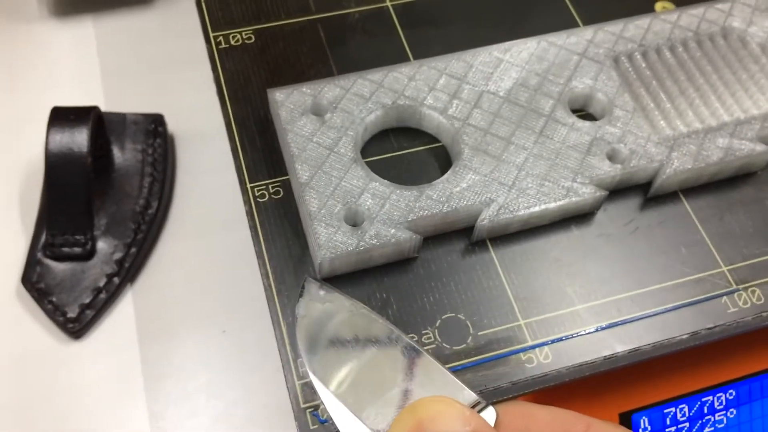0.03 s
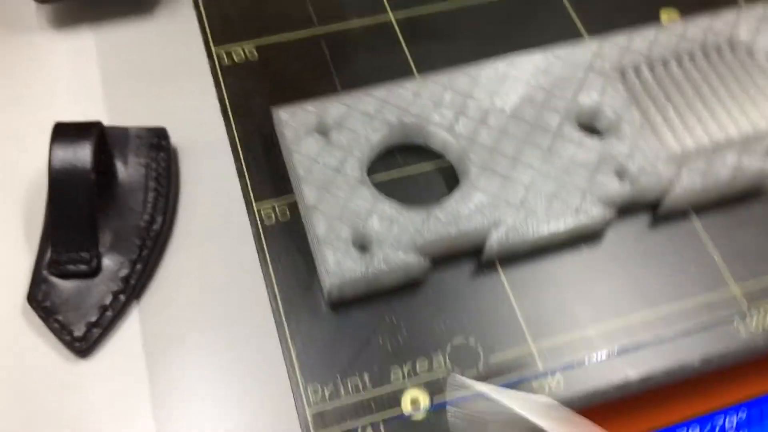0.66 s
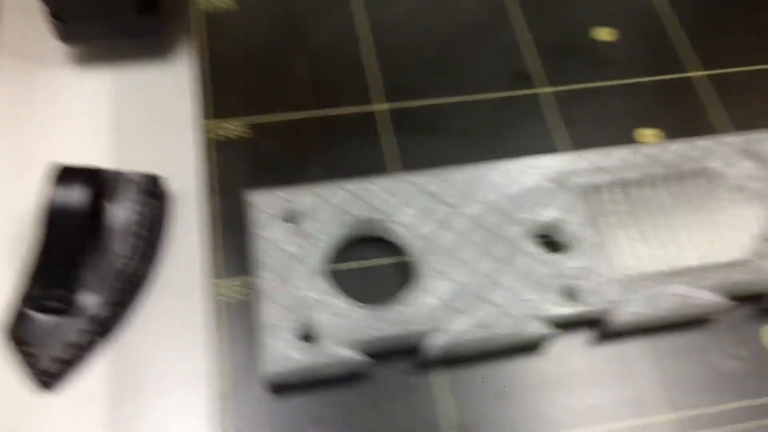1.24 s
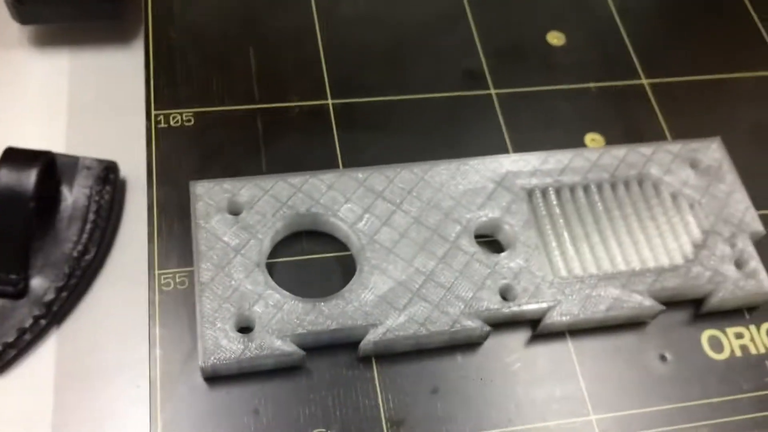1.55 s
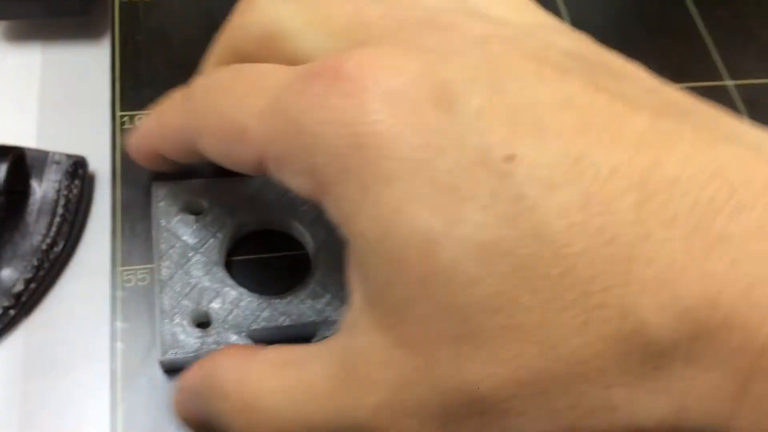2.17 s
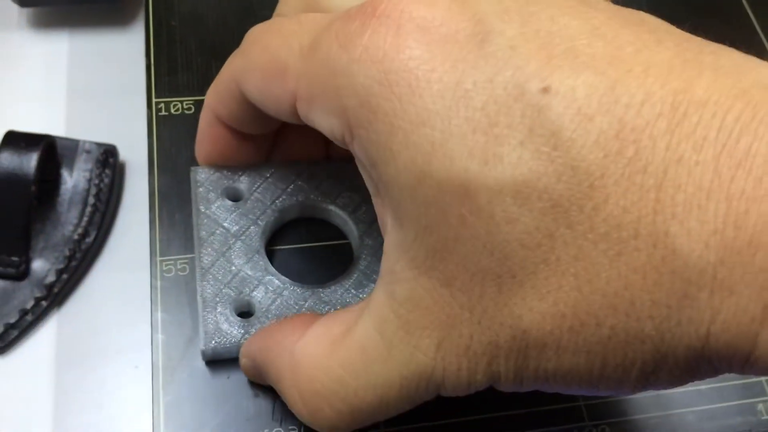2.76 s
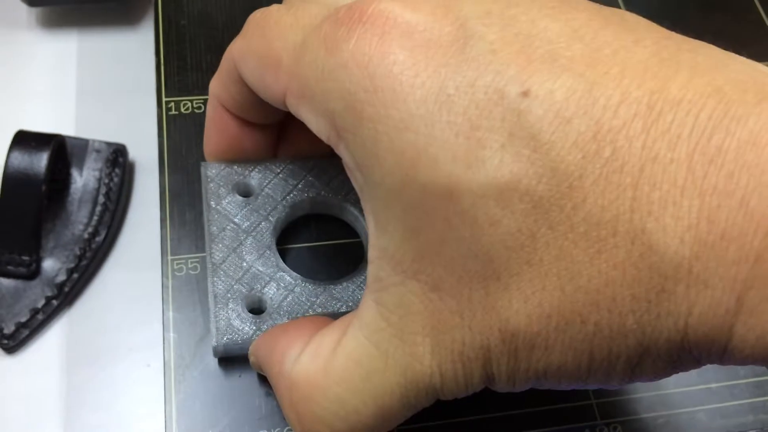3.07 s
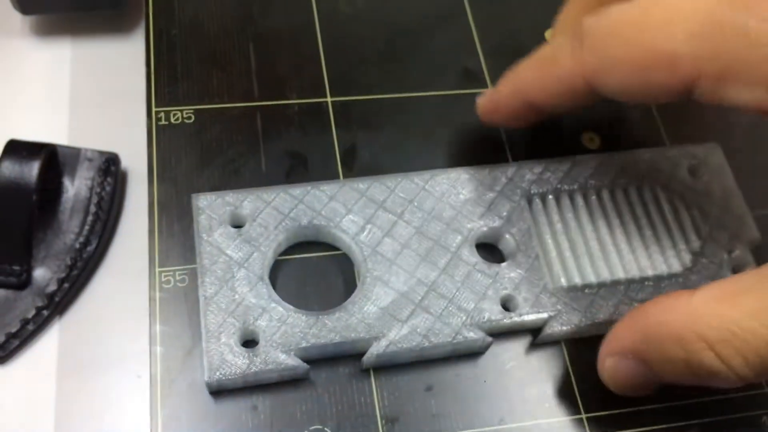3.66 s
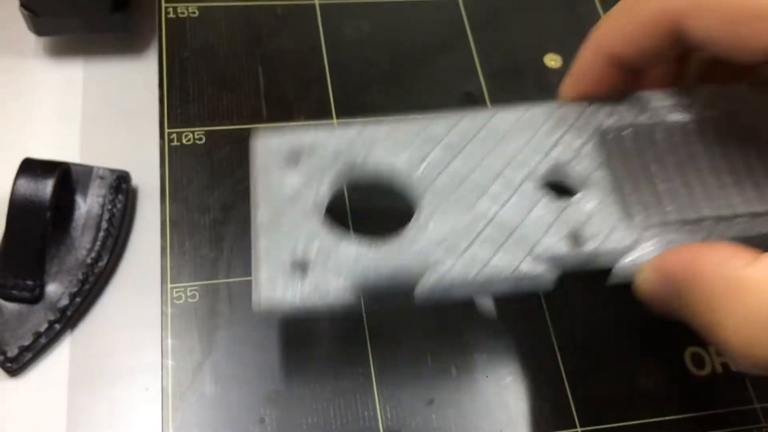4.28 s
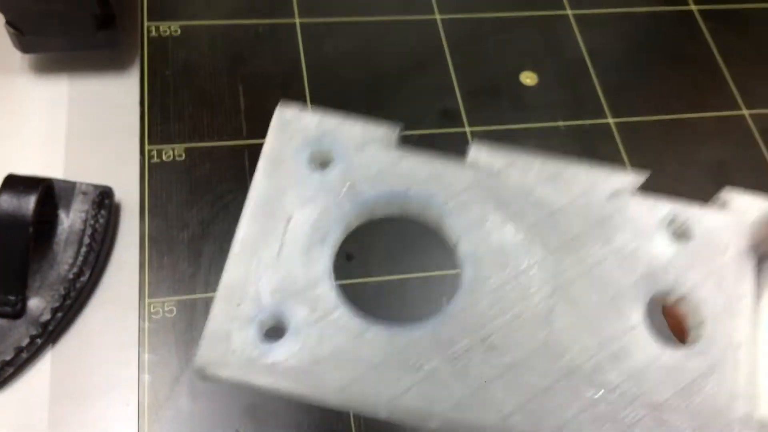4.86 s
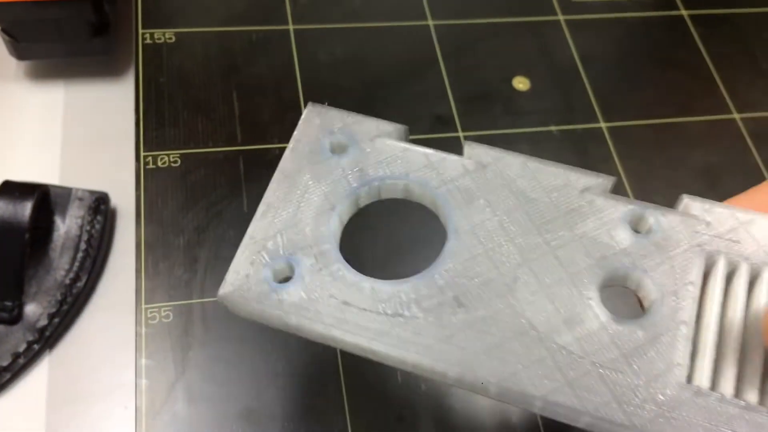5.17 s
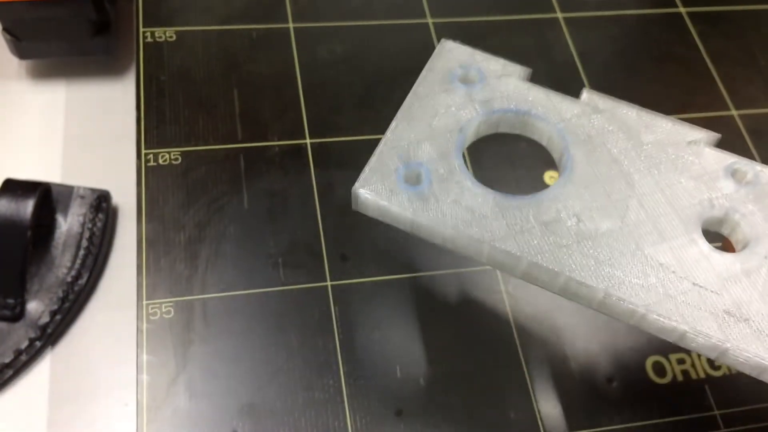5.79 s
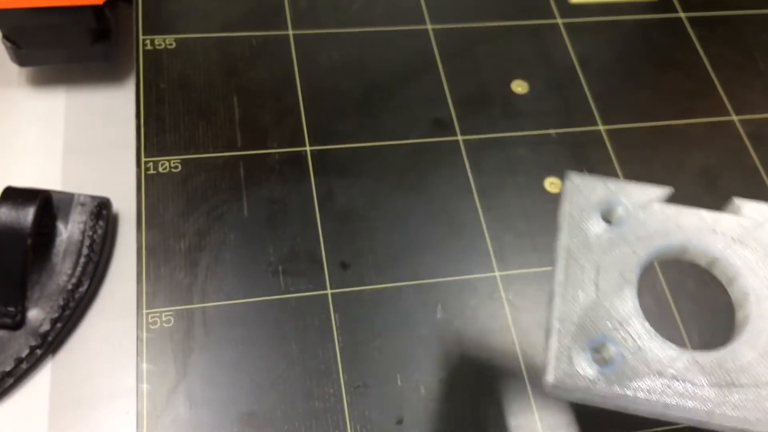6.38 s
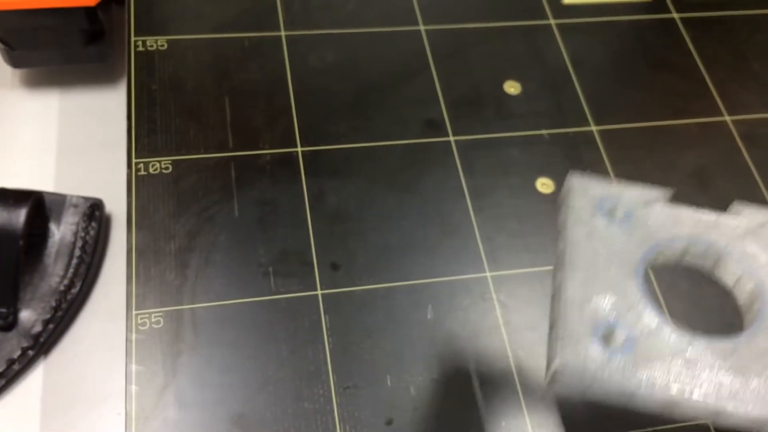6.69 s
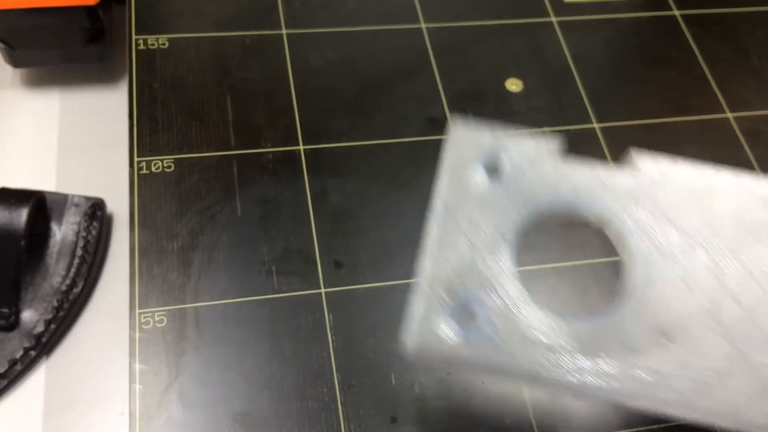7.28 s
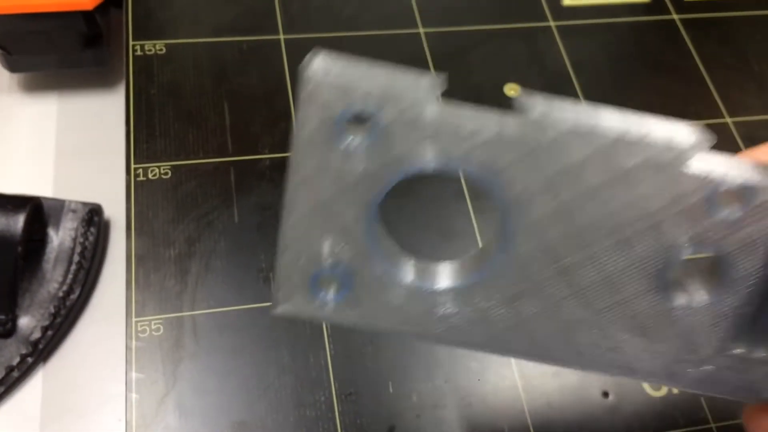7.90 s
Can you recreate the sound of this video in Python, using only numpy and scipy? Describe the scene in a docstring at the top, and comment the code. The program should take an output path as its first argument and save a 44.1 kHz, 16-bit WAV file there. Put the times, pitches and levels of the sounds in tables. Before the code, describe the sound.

Close up in a small room, a blade sticks and slips against plastic with gritty clicks, levering a plate so it knocks on a printer bed. The knife then clatters onto the desk, pinging briefly. After a pause come several bright cracks and a few knocks as the plate breaks free, then soft fingertip ticks. A printer fan runs throughout with a low hum and thin whine.

```python
"""A 3D printer's fan runs throughout in a small room. A knife tip scrapes in under a printed plastic
plate, sticking and slipping, and levers it up so that it knocks on the printer bed. The knife is put
down on the desk, where its blade rattles and pings. Then a hand twists the plate: its bond to the bed
crackles and snaps loose, and the bed rings. Last, fingers tick on the plate as it is lifted.
An automatic volume control turns everything down briefly at each loud hit."""
import sys
import numpy as np
from scipy import signal
from scipy.fft import rfft, irfft, next_fast_len
from scipy.io import wavfile
from scipy.ndimage import uniform_filter1d, minimum_filter1d, map_coordinates

SR = 44100
rng = np.random.default_rng(int(sys.argv[2]) if len(sys.argv) > 2 else 0)


def int16_out(signal):
    """Quantize to a 16-bit WAV file."""
    q = np.round(np.clip(np.atleast_2d(signal).T, -1, 1) * 32767)
    wavfile.write(sys.argv[1], SR, q.astype(np.int16))


N = 358974
HIT_SIZE = 16384  # samples in one hit
T = np.arange(HIT_SIZE) / SR
HIT_HZ = np.fft.rfftfreq(HIT_SIZE, 1 / SR)
FIRM_DB = -10  # a firm hit; harder and softer ones change tone by how far they are from it


def amp(db):
    """Turns decibels into a number to multiply by."""
    return 10 ** (np.asarray(db) / 20)


def unit(x):
    """Scales a sound to an average strength (rms) of 1."""
    return x / np.sqrt(np.mean(x ** 2) + 1e-20)


def unit_attack(x, size=375):
    """Scales a hit to an average strength of 1 over its first milliseconds."""
    return x / np.sqrt(np.mean(x[:size] ** 2) + 1e-20)


def read(points, hz):
    """Looks up values between a table's frequencies, with octaves evenly spaced."""
    f, value = np.transpose(points)
    return np.interp(np.log(hz + 1), np.log(f + 1), value)


def follow(points):
    """Joins a table's points in time with straight lines, one curve per value column."""
    s, *columns = np.transpose(points)
    return [np.interp(np.arange(N) / SR, s, column) for column in columns]


def add(mix, s, sound):
    """Mixes a sound in, starting at s seconds."""
    part = mix[max(round(s * SR), 0):][:len(sound)]
    part += sound[:len(part)]


def drift(rate_hz):
    """A random wobble of about size 1, mostly slower than rate_hz."""
    hz = np.fft.rfftfreq(N, 1 / SR)[:N // 100]
    spectrum = rfft(rng.standard_normal(2 * len(hz) - 2))
    slow = unit(irfft(spectrum / (1 + (hz / rate_hz) ** 2)))
    return np.interp(np.arange(N), np.linspace(0, N, len(slow)), slow)


def noise(spectrum, resonances=()):
    """Steady noise with a given tone, boosted at its resonances."""
    size = next_fast_len(N, True)
    hz = np.fft.rfftfreq(size, 1 / SR)
    boost_db = sum(lift / (1 + (2 * (hz - centre) / width) ** 2) for centre, width, lift in resonances)
    gain = amp(read(spectrum, hz) + boost_db)
    return unit(irfft(rfft(rng.standard_normal(size)) * gain, size)[:N])


def colour(x, db):
    """Shapes a hit's tone, one level per frequency, without smearing sound ahead of its start."""
    log_gain = np.log(amp(np.maximum(db, -100)))
    mirrored = np.concatenate([log_gain, log_gain[-2:0:-1]])
    taps = np.fft.ifft(np.exp(np.conj(signal.hilbert(mirrored)))).real
    return signal.fftconvolve(x, taps[:HIT_SIZE // 4])[:HIT_SIZE]


def ring(notes, spread, share_db=-0.6):
    """A struck object's notes, a little different each blow; each fades 60 dB in its ring time."""
    hz, db, ring_s = np.transpose(notes)[:, :, None]
    detune, share, side = rng.standard_normal((3, len(notes), 1))
    fade = amp(db + share_db * share - 60 * T / ring_s)
    waves = np.sin(2 * np.pi * hz * (1 + spread * detune) * T)
    return (np.sign(side) * fade * waves).sum(0)


def contact(spectrum, length_s, tilt_db, echo_db, echo_s, paths=0):
    """A burst of tiny impacts and its nearby echoes; blows at one spot share their echo paths."""
    burst = rng.standard_normal(HIT_SIZE) * np.exp(-T / length_s)
    echoes = unit(paths + 0.5 * rng.standard_normal(HIT_SIZE)) * amp(echo_db - 60 * T / echo_s)
    rise = 1 - np.exp(-T / (0.11 * length_s))  # longer contacts build up more slowly
    octaves = np.log2(np.maximum(HIT_HZ, 500) / 500)  # tilt_db is added per octave above 500 Hz
    return unit_attack(colour(rise * (burst + echoes), read(spectrum, HIT_HZ) + tilt_db * octaves))


def reflected(x, count=7):
    """Echoes off the printer and desk ripple a steady sound as their delays slowly creep."""
    out = x.copy()
    for delay_s in rng.uniform(.002, .012, count):
        earlier = np.arange(N) - SR * (delay_s + 4e-5 * drift(.2))
        out += .15 * map_coordinates(x, [earlier], order=3, mode="wrap")
    return unit(out)


# The tone of the rushing air. Each row: frequency in Hz, level in dB.
RUSH_TONE = [(180, -24), (300, -7.5), (500, -11.5), (800, -10.5), (1100, -5), (1380, -8.5), (1900, -9.5),
             (2600, -5), (3400, -7), (4000, -11), (4700, -15), (6200, -18.5), (9000, -20), (15300, -26)]
# The resonances of the fan's duct. Each row: frequency in Hz, width in Hz, boost in dB.
DUCT_PEAKS = [(1120, 38, 0.5), (1270, 23, 4), (1560, 160, 5.5), (2135, 290, 5), (2840, 51, 5.5),
              (3068, 50, 9), (3480, 130, 3.5), (5580, 510, 4.5)]
def air_rush(treble_db, db=-45.5, flutter_db=0.9):
    """Air flutters through the fan's duct; treble_db raises or lowers its hiss."""
    air = reflected(noise(RUSH_TONE, DUCT_PEAKS))
    lows = signal.sosfiltfilt(signal.butter(2, 4200, fs=SR, output="sos"), air)
    return amp(db + flutter_db * drift(8.7)) * (lows + amp(treble_db) * (air - lows))


# The tone of the printer's hum. Each row: frequency in Hz, level in dB.
HUM_TONE = [(20, -41), (35, -32), (60, -9.5), (90, -13), (120, -2), (145, 0), (195, -0.5), (250, -14),
            (330, -18), (500, -43.5)]
def housing_hum(db=-49, throb_db=0.8):
    """The printer's housing gives a low, throbbing hum."""
    return amp(db + throb_db * drift(12)) * noise(HUM_TONE)


# The tone of the whirr. Each row: frequency in Hz, level in dB.
WHIRR_TONE = [(2330, -43), (2500, -0.5), (2650, -1.5), (2830, -40)]
def fan_whirr(swell_db, db=-55.5, flutter_db=1.3):
    """The tips of the fan's blades make a narrow band of fluttering noise."""
    return amp(db + swell_db + flutter_db * drift(40)) * noise(WHIRR_TONE)


# The fan's high notes. Each row: frequency in Hz, base level in dB.
WHINE_NOTES = [(4141, -62.5), (4969, -60), (5803, -79)]
def fan_whine(swell_db, low_hz=1449, low_db=-55.5, wander=0.000664, waver_db=0.6):
    """The spinning fan sings wavering notes; a hand over the plate shields the lowest for a while."""
    hand_in_s, hand_out_s, move_s, shield_db = 1.4, 3.3, 0.56, -5
    hand_db, = follow([(hand_in_s, 0), (hand_in_s + move_s, shield_db),
                       (hand_out_s - move_s, shield_db), (hand_out_s, 0)])
    fan_time = np.cumsum(1 + wander * drift(2.88)) / SR  # all notes wander in pitch together
    notes = [(low_hz, low_db + hand_db)] + [(hz, db + swell_db) for hz, db in WHINE_NOTES]
    return sum(amp(db + waver_db * drift(15)) * np.sqrt(2) * np.sin(2 * np.pi * hz * fan_time)
               for hz, db in notes)


# The fan slowly gets softer. Each row: time in seconds, level change in dB, treble change in dB.
FAN_FADE = [(0, 2.5, 1), (1.5, 1, 0), (5.3, 0.6, 1.3), (8.1, 0, -1.5)]
# The whine and whirr swell and sink. Each row: time in seconds, level change in dB.
WHINE_SWELL = [(0, -0.5), (1.7, -6.5), (2, 1.5), (3.4, 0), (5.2, 3.5), (6.6, 3), (8.1, 3.5)]
def fan():
    """The running fan: rush, whirr and whine slowly change level over the housing's hum."""
    level_db, treble_db = follow(FAN_FADE)
    swell_db, = follow(WHINE_SWELL)
    rush, hum = air_rush(treble_db), housing_hum()
    return amp(level_db) * (rush + fan_whirr(swell_db) + fan_whine(swell_db)) + hum


# The notes of the plate's edge. Each row: base frequency in Hz, level in dB, ring time in seconds.
EDGE_NOTES = [(3500, -18.5, 0.08), (6560, -5, 0.025), (7170, -11.5, 0.026), (8060, -0.5, 0.059),
              (8400, -15.5, 0.033), (8610, 0.5, 0.056), (9820, -7, .03), (10350, 0.5, 0.026),
              (10200, 4, 0.024)]
def snap(spectrum, paths, length_s, tilt_db, edge_db, pitch, echo_db, echo_s):
    """A sudden slip: a sharp click and the bright ring of the plate's edge."""
    damping = .2 + np.exp(-T / .0026)  # the bed stops most of the ring at once
    edge = unit_attack(ring(np.array(EDGE_NOTES) * [pitch, 1, 1], spread=0.0028) * damping)
    click = contact(spectrum, length_s, tilt_db, echo_db, echo_s, paths)
    return unit_attack(click + amp(edge_db) * edge)


# The tone of a scrape on the plate. Each row: frequency in Hz, level in dB.
SCRAPE_TONE = [(60, -20), (300, -22.5), (600, -10.5), (820, -6.5), (1100, -7), (2700, -8), (3700, 0),
               (4900, -2), (6500, 4.5), (10000, 3), (12500, 3), (15200, 2)]
# The notes of the blade pressed on the plate. Each row: frequency in Hz, level in dB, ring time in seconds.
PRESSED_NOTES = [(780, 2, 0.068), (838, -1, 0.077), (1610, -5, .06), (2330, -2.5, 0.074),
                 (3620, 4.5, 0.084), (4420, -6, .06), (5780, 1, 0.061)]
# The blade slips at the plate's rim. Each row: start in seconds, level in dB, length in seconds.
BLADE_SLIPS = [(.0005, -27, 0.0055), (0.0153, -25.5, .0011), (0.0235, -15, 0.0017), (0.0303, -16.5, .005),
               (0.06, -27, 0.0012), (.1218, -31.5, 0.00059), (0.1882, -24, 0.0011),
               (0.1976, -18.5, 0.00099), (0.212, -23.5, .0011), (0.24, -20.5, .0007), (.249, -9.5, 0.0063),
               (0.255, -15, .005), (0.2647, -12.5, 0.0016), (0.282, -10, .0008), (0.2984, -12.5, 0.00085),
               (0.3132, -12, 0.0031), (.3385, -14, 0.0025), (0.4407, -20, 0.00099), (0.466, -20, .001)]
def blade_slips(wedged_s=.272, sag_per_s=0.61, brighten=0.067, damping_db=2.2, steel_db=-21):
    """The knife sticks and slips; harder slips are brighter, longer ones damp the plate's edge more."""
    out, paths = np.zeros(N), rng.standard_normal(HIT_SIZE)
    for s, db, length_s in BLADE_SLIPS:
        if s < wedged_s:  # the tip skids on the rim and the edge hardly rings
            edge_db, pitch = -13, 0.71
        else:  # the tip is wedged under: the edge rings out and sinks in pitch
            edge_db, pitch = 5.5, 1.01 - sag_per_s * (s - wedged_s)
        edge_db -= damping_db * np.log2(length_s / 0.0007)
        tilt_db = -0.5 + brighten * (db - FIRM_DB)
        slip = snap(SCRAPE_TONE, paths, length_s, tilt_db, edge_db, pitch, echo_db=-7.5, echo_s=0.062)
        steel = amp(steel_db) * ring(PRESSED_NOTES, spread=0.0064)
        add(out, s, amp(db) * (slip + steel))
    return out


def blade_grit(stop_s=0.29, per_s=130, db=-46, spread_db=2):
    """Between slips the blade grates over fine ridges in the plastic, which keep it ringing."""
    strikes = (rng.random(HIT_SIZE) < per_s / SR) * (T < stop_s)
    sizes = amp(spread_db * np.minimum(rng.exponential(1, HIT_SIZE), 3))
    click = contact(SCRAPE_TONE, length_s=0.0015, tilt_db=-4.5, echo_db=-11, echo_s=0.072)
    steel = amp(-7) * ring(PRESSED_NOTES, spread=0.0046)
    out = np.zeros(N)
    add(out, 0, amp(db) * unit(signal.fftconvolve(strikes * sizes, click + steel)))
    return out


def body(panel, frame, ring_db, thump_db, swell_s):
    """A struck panel rings at once, and its frame follows with a slower thump."""
    ringing = amp(ring_db) * ring(panel, spread=0.0021)
    thump = amp(thump_db) * ring(frame, spread=0.012) * (1 - np.exp(-T / swell_s))
    return ringing + thump


# The notes of the bed and of its frame. Each row: frequency in Hz, level in dB, ring time in seconds.
BED_NOTES = [(401, -18.5, 0.42), (482, -4, 0.1), (557.3, -4, 0.23), (650, -12.5, 0.098), (815, -16, 0.075),
             (824, -1, 0.24), (1259.5, -1.5, 0.12), (1340, -30, .12), (1798, -12, 0.18), (2205, -7, 0.11)]
BED_FRAME_NOTES = [(118, -6, 0.18), (140.8, -4, 0.2), (155.7, -3.5, 0.53), (189.8, -2, 0.14),
                   (221, -13.5, 0.32)]
# The knocks on the bed; the last row is a hand bumping it. Each row: start in seconds, level in dB, weight
# (thump compared with click) in dB.
BED_KNOCKS = [(.459, -18, -23), (0.4698, -7, -15), (0.603, -18.5, -10.5), (3.2313, -7.5, -2.5),
              (3.284, -16.5, -10), (3.414, -28, -4), (4.058, -53, 13.5)]
def bed_knocks(length_s=0.0044, brighten=.3, dulling=0.13):
    """The plate knocks on the bed, and last a hand bumps it: force brightens a blow, weight dulls it, both make
    the bed ring more."""
    out = np.zeros(N)
    for s, db, weight_db in BED_KNOCKS:
        force_db = db - FIRM_DB
        tilt_db = -2.5 + brighten * force_db - dulling * weight_db
        ring_db = -5 + 0.73 * force_db + 0.45 * weight_db
        click = contact(KNOCK_TONE, length_s, tilt_db, echo_db=1.5, echo_s=0.061)
        bed = body(BED_NOTES, BED_FRAME_NOTES, ring_db, weight_db, swell_s=0.0099)
        add(out, s, amp(db) * (click + bed))
    return out


# The tone of the plate meeting the bed. Each row: frequency in Hz, level in dB.
KNOCK_TONE = [(40, -6.5), (160, -2.5), (270, -3.5), (550, -4.5), (900, -4.5), (1600, -3.5), (3400, -1),
              (6000, 0.5), (10000, -2), (15200, -5.5)]
# The tone of a tap on the desk. Each row: frequency in Hz, level in dB.
DESK_TONE = [(20, -14), (50, -2.5), (130, 3), (260, -7.5), (420, 1.5), (800, -2), (1100, 2), (1600, -8),
             (3600, -4.5), (5500, -9), (7000, -16.5), (9000, -20.5), (13000, -27), (15200, -36)]
# The notes of the desk and of its frame. Each row: frequency in Hz, level in dB, ring time in seconds.
DESK_NOTES = [(376, -9, .13), (413, -3.5, 0.18), (487, -6, 0.12), (562, -3, 0.12), (630, -7, 0.13),
              (940, 1, 0.036), (1094, 3.5, 0.049), (1080, 1, 0.071), (1140, -1.5, 0.047), (1285, -11, 0.18),
              (1848, -0.5, 0.086)]
DESK_FRAME_NOTES = [(52, -23, .12), (93.7, -1, 0.16), (135, -1.5, 0.12), (155.3, -1.5, 0.18)]
# The landings. Each row: start in seconds, level in dB, weight (thump compared with tap) in dB.
DESK_LANDINGS = [(1.362, -40, 12), (1.409, -51.5, 20), (1.5486, -13, -20), (1.5508, -11.5, -15),
                 (1.668, -37, 0)]
def desk_landings(dulling=0.15, muffling=0.48):
    """A hand, then the knife's handle land; weight makes a tap longer and duller and muffles the desk."""
    out = np.zeros(N)
    for s, db, weight_db in DESK_LANDINGS:
        length_s = 0.0076 * 2 ** (weight_db / 11)
        tap = contact(DESK_TONE, length_s, tilt_db=-2.5 - dulling * weight_db, echo_db=-1, echo_s=.064)
        desk = body(DESK_NOTES, DESK_FRAME_NOTES, -12 - muffling * weight_db, weight_db, swell_s=0.0052)
        add(out, s, amp(db) * (tap + desk))
    return out


SLAP_S = 1.5725  # the blade lands flat on the desk
def blade_rattle(count=4, db=-8.5, bounce_s=.0136, tap_loss_db=5, desk_loss_db=2):
    """The blade slaps the desk and bounces, weaker and duller each time; the desk fades more slowly."""
    out = np.zeros(N)
    for k in range(count):
        tap = contact(DESK_TONE, length_s=.0035, tilt_db=2.5 - 2 * k, echo_db=-2.5, echo_s=0.075)
        desk = body(DESK_NOTES, DESK_FRAME_NOTES, ring_db=-23, thump_db=-13, swell_s=0.0061)
        add(out, SLAP_S + k * bounce_s, amp(db - k * tap_loss_db) * tap + amp(-k * desk_loss_db) * desk)
    return out


# The notes of the free blade. Each row: frequency in Hz, level in dB, ring time in seconds.
STEEL_NOTES = [(3790, -1, .06), (6700, 1, 0.1), (12800, -1.5, 0.092)]
def steel_ping(db=-18):
    """The steel blade rings briefly as it lands flat."""
    out = np.zeros(N)
    add(out, SLAP_S, amp(db) * ring(STEEL_NOTES, spread=0.0022))
    return out


# The tone of a crack. Each row: frequency in Hz, level in dB.
CRACK_TONE = [(30, -48), (150, -3), (380, -29), (580, 2), (1000, -38), (1650, -7.5), (2600, -19), (3400, 0),
              (4600, -8), (6300, -2.5), (8800, -1.5), (10400, -1.5), (11200, -5), (15200, -6.5)]
# The cracks. Each row: start in seconds, level in dB, edge pitch as a factor, treble tilt in dB per octave.
BOND_CRACKS = [(2.8571, -8, 0.96, 0.5), (2.8925, -11, 0.95, -0.8), (2.9228, -9, .94, -0.5),
               (2.9402, -10.5, .94, 0.3), (3.0485, -17, .68, 8), (3.2031, -24.5, 0.95, 1),
               (3.2168, -23, 1.31, -1)]
def bond_cracks(length_s=.0014, bed_db=-32.5):
    """The bond gives way: big cracks ring the plate's edge, small ones just tick; the bed rings faintly."""
    out, paths = np.zeros(N), rng.standard_normal(HIT_SIZE)
    for s, db, pitch, tilt_db in BOND_CRACKS:
        edge_db = 1 + db - FIRM_DB
        crack = snap(CRACK_TONE, paths, length_s, tilt_db, edge_db, pitch, echo_db=-1, echo_s=.06)
        bed = amp(bed_db) * ring(BED_NOTES, spread=0.012)
        add(out, s, amp(db) * (crack + bed))
    return out


# Fingers touch the loose plate. Each row: start in seconds, level in dB.
FINGER_TICKS = [(4.156, -48), (4.263, -49), (4.357, -41.5), (4.397, -48), (4.458, -53), (4.63, -43.5)]
def finger_ticks():
    """Skin and nail make faint, bright ticks on the plate's ridges."""
    out = np.zeros(N)
    for s, db in FINGER_TICKS:
        add(out, s, amp(db) * contact(SCRAPE_TONE, length_s=0.0012, tilt_db=-1, echo_db=-13, echo_s=.08))
    return out


# How long the room rings. Each row: frequency in Hz, ring time in seconds.
ROOM_RING = [(100, 0.62), (500, 0.28), (2000, 0.21), (6000, 0.2), (15000, 0.063)]
def room(x, wet_db, build_s=0.0043):
    """A small room adds a wash of echoes whose high notes die first."""
    hz, t, bands = signal.stft(rng.standard_normal(HIT_SIZE), SR, nperseg=256)
    fade = amp(-60 * t / read(ROOM_RING, hz)[:, None])
    tail = signal.istft(bands * fade, SR, nperseg=256)[1][:HIT_SIZE]
    tail *= 1 - np.exp(-T / build_s)
    return x + amp(wet_db) * signal.fftconvolve(x, tail / np.linalg.norm(tail))[:N]


def scene():
    """The work on the plate and, closer and with less echo, the knife on the desk, over the fan."""
    prying = blade_slips() + blade_grit() + bond_cracks() + bed_knocks() + finger_ticks()
    knife_down = desk_landings() + blade_rattle() + steel_ping()
    return (room(prying, wet_db=-16.5) + room(knife_down, wet_db=-20) + fan())[None]


def record(dry, threshold_db=-19, deepest_db=4.0, hold_s=0.11, release_s=0.23, top_hz=15400):
    """The volume dips on loud hits, holds and recovers; peaks overload; the highest treble is cut."""
    power_db = 10 * np.log10(abs(uniform_filter1d(dry[0] ** 2, size=128)) + 1e-12)
    cut_db = -np.clip(power_db - threshold_db, 0, deepest_db)
    hold, release = int(hold_s * SR), int(release_s * SR)
    held_db = minimum_filter1d(cut_db, hold, origin=(hold - 1) // 2, mode="constant")
    eased_db = uniform_filter1d(held_db, release, origin=(release - 1) // 2, mode="constant")
    clipped = np.clip(dry * amp(np.minimum(held_db, eased_db)), -1, 1)
    treble_cut = signal.firwin(255, top_hz, window=("kaiser", 8), fs=SR)
    return signal.oaconvolve(clipped, treble_cut[None], "same")


dry = scene()
out = record(dry)
int16_out(out)
```